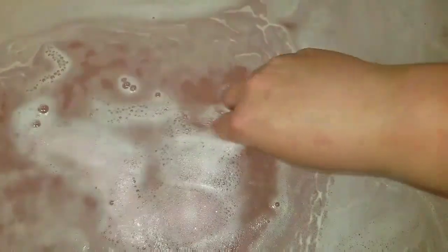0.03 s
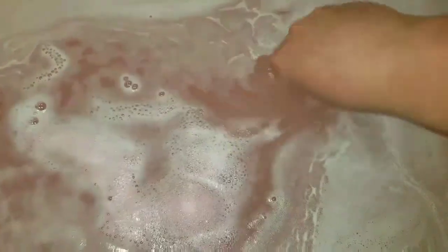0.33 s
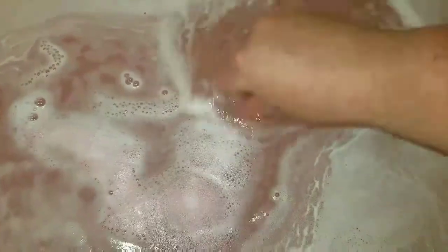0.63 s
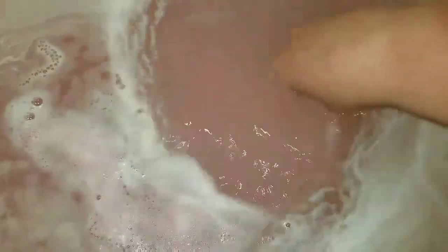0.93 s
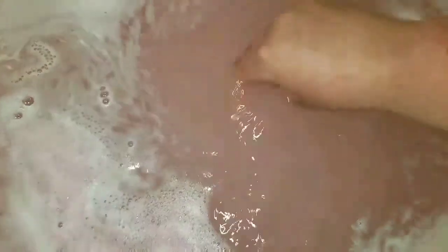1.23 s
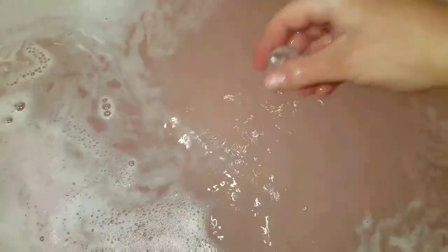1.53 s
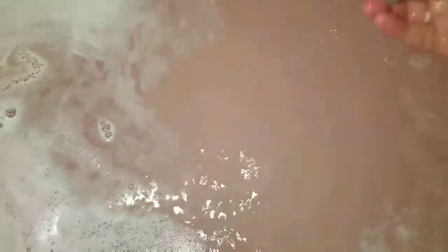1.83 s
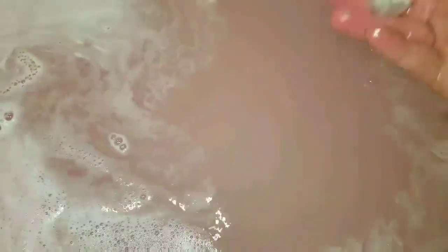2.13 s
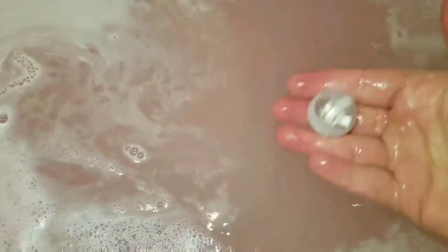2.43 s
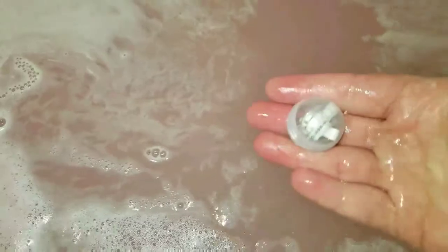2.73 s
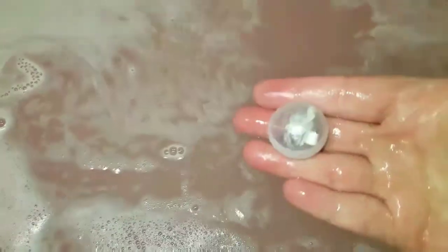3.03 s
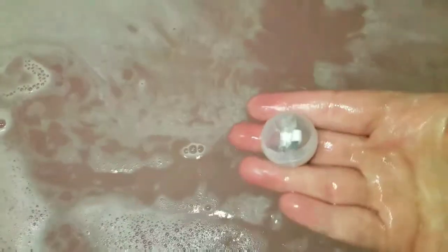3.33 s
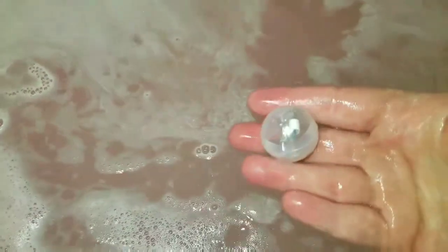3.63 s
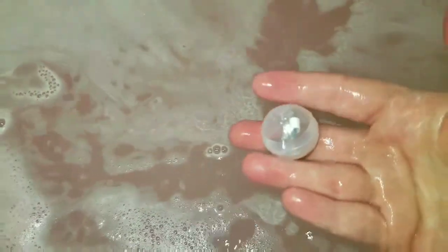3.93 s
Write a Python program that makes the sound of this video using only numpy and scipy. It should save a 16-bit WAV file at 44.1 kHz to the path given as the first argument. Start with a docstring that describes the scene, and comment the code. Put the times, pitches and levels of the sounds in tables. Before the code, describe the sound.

Small drips and bubbly plips come in a flurry with gentle sloshing as a hand moves through bathwater, then thin to single drops. Heard just above the tub, with short bathroom echo, fading foam fizz and a steady fan hum.

```python
"""A slosh and a flurry of plips: a hand stirs a foamy bath, lifts out and drips into the water.
Drops tick on the surface and trap bubbles that ring with rising pitch.
Tub, ceiling and hard walls of the small bathroom echo them.
The foam fizzes and grows softer as it settles, over faint hiss and the low hum of a fan."""
import sys
import numpy as np
from scipy import signal
from scipy.fft import rfft, irfft, next_fast_len
from scipy.io import wavfile
from scipy.ndimage import map_coordinates

SR = 44100
rng = np.random.default_rng(int(sys.argv[2]) if len(sys.argv) > 2 else 0)


def pcm_store(signal):
    """Save signal as 16-bit PCM."""
    levels = np.round(np.clip(np.atleast_2d(signal), -1, 1) * 32767)
    wavfile.write(sys.argv[1], SR, levels.astype(np.int16).T)


N = 176400  # 4 s

# ringing bubbles (time [s], start pitch [Hz], dry peak [dB], t60 [s], echo re dry [dB])
BUBBLE_RINGS = [(0.1524, 1710, -47.5, 0.017, -8), (0.164, 1340, -35, .006, -2.5),
                (0.1669, 1100, -42, 0.034, -1.5), (0.1728, 1840, -42.5, 0.015, -0.5),
                (.1888, 2150, -45, 0.0067, -1), (.1900, 2920, -48, 0.0065, -3),
                (.2105, 1390, -54, 0.0099, -10), (.2398, 2620, -52, 0.019, -4),
                (0.2553, 1500, -57, .010, 4), (0.4616, 1380, -60, 0.048, 5.5),
                (.4630, 1850, -51.5, 0.014, -1.5), (.5290, 2410, -63, 0.041, -10),
                (0.5646, 1935, -38, 0.013, -3.5), (.5885, 2220, -47, 0.005, -1),
                (.6690, 1055, -50.5, 0.027, 2), (.6680, 1530, -52, 0.011, 4),
                (0.8126, 1966, -31, 0.022, 3.5), (0.8374, 1543, -44.5, 0.036, -5),
                (1.091, 1756, -46.5, 0.022, 0.5), (1.0946, 1105, -53.5, 0.066, 1.5),
                (1.5606, 2527, -48, .020, 9), (1.573, 2570, -46.5, 0.014, 5),
                (1.59, 3070, -45.5, 0.004, 4.5), (2.291, 1717, -45.5, 0.028, 4),
                (3.1701, 2837, -49.5, 0.028, 2), (3.6283, 2495, -48, 0.059, -4),
                (3.6354, 2700, -53, 0.015, 2.5)]
# drops landing, films bursting (time [s], centre [Hz], dry peak [dB])
DROP_TICKS = [(0.141, 4050, -56), (.1535, 3800, -64), (.1750, 6500, -59), (.1908, 5200, -54.5),
              (.2110, 5600, -58), (.2420, 4900, -53), (.2550, 5800, -58), (.4630, 3620, -54),
              (0.5611, 12720, -41.5), (0.564, 5500, -57.5), (0.589, 3420, -49), (0.667, 5300, -52),
              (.8101, 13200, -48), (0.814, 3400, -54), (0.889, 4150, -54), (1.0935, 7340, -46),
              (1.1097, 7850, -48.5), (1.3490, 6340, -61), (1.373, 12900, -54), (1.5085, 11000, -51),
              (1.5599, 6340, -44), (1.563, 13900, -44), (1.5712, 13500, -49), (1.584, 4400, -53),
              (1.5933, 4880, -54), (1.7485, 15500, -48), (2.2910, 1900, -56), (2.585, 11600, -59.5),
              (3.1706, 4600, -58), (3.5868, 7100, -63), (3.63, 6740, -54.5), (3.6212, 14200, -47.5),
              (3.634, 4100, -59), (3.7580, 15000, -54.5)]
# tick echoes, finest ticks driest (centre [Hz], echo re dry [dB])
TICK_ECHO_DB = [(3000, 0.5), (7000, -1), (13000, -2.5)]
# water sliding round the hand (crest time [s], rise [s], fall [s], level [dB])
SLOSH_SWELLS = [(0.156, 0.075, 0.18, -59), (.68, 0.015, 0.089, -66), (1.11, 0.036, 0.15, -67.5),
                (1.36, 0.09, 0.15, -68)]
# slosh spectrum (frequency [Hz], relative level [dB])
SLOSH_SPECTRUM = [(200, 0.5), (500, 2), (1200, -8), (2500, -12.5), (4000, -26), (7000, -22), (10000, -52)]
# settling foam (time [s], level [dB])
FOAM_LEVEL_DB = [(0, -68), (.7, -67), (1.6, -68.5), (1.95, -72), (2.9, -74.5), (3.45, -72.5), (4, -76.5)]
# fizz spectrum (frequency [Hz], relative level [dB])
FOAM_SPECTRUM = [(1500, -7), (3500, -28), (5500, -7.5), (6600, -1), (7700, 2.5), (8300, -6), (9700, -6.5),
                 (11000, 1), (12200, 0), (13200, 8), (14300, 0.5), (15800, 8)]
# narrow hiss bands (crest time [s], 1/e half length [s], centre [Hz], level [dB])
HISS_SWELLS = [(1.372, 0.12, 3820, -84.5), (2.645, 0.063, 2070, -77.5), (2.69, 0.2, 1205, -76),
               (3.778, 0.15, 3170, -84)]
# fan hum lines (frequency [Hz], base level [dB], unsteadiness [0-1])
FAN_LINES = [(35.9, -64, 0.24), (75.56, -45, 0.22), (118.1, -49.5, 0.64), (194.9, -57, 0.8),
             (236, -65.5, 0.29), (254.7, -67.5, 0.4), (317.4, -69.5, 0.51), (354, -63.5, 0.77)]
# fan air rumble (frequency [Hz], relative level [dB])
AIR_SPECTRUM = [(20, -78.5), (45, -84), (68, -63), (105, -66.5), (135, -75.5), (185, -75), (215, -83.5),
                (330, -83), (420, -87.5), (520, -88.5), (750, -98), (1030, -103), (1140, -92),
                (1350, -101.5), (1700, -106.5), (2500, -112.5), (4000, -120), (8000, -125), (16000, -126)]
# gain on hum and rumble (time [s], gain [dB])
FAN_GAIN_DB = [(0, 1), (.17, 3.5), (.45, .5), (1.3, 0), (2.1, 0), (3.0, -0.5), (3.6, 0), (4, -1.5)]
# bathroom decay (frequency [Hz], t60 [s])
ROOM_T60_S = [(300, 0.82), (1200, 0.21), (2000, 0.37), (3200, 0.28), (7000, 0.22), (15000, 0.081)]

BUBBLE_ATTACK_S, PITCH_RISE_PER_S = 0.00036, 2.4  # rise as a fraction of start pitch
TICK_T60_S, TICK_WIDTH_HZ, TICK_SKIRT_DB = 0.0054, 1870, -21
SLOSH_LUMPS_DB, SLOSH_LUMPS_PER_S = 4.5, 280
POPS_PER_S, POP_SPREAD_DB, POPS_RE_HISS_DB = 900, -3.5, -6.5
HISS_WIDTH_HZ = 420
HUM_WAVER_PER_S, AIR_BASE_DB, AIR_DIRECT_RE_ROOM_DB = 7, -48.5, 1
WALL_DELAY_S, CEILING_DELAY_S, CEILING_WIDTH_S, CEILING_BOOST_DB = 0.0042, 0.025, 0.0019, 5.5
TOP_HZ = 15850


def plips():
    """Each trapped bubble rings briefly, rising in pitch as it nears the surface."""
    out, t = np.zeros(N), np.arange(SR // 20) / SR
    for start_s, hz, peak_db, t60_s, echo_db in BUBBLE_RINGS:
        envelope = (1 - np.exp(-t / BUBBLE_ATTACK_S)) * amp(-60 * t / t60_s)
        cycles = hz * (t + PITCH_RISE_PER_S * t * t / 2)
        ring = np.sin(2 * np.pi * cycles) * envelope / envelope.max()
        add(out, start_s, in_room(amp(peak_db) * ring, echo_db))
    return out


def ticks():
    """Drops land, films burst: millisecond noise snaps, one band over a broadband skirt."""
    out, t = np.zeros(N), np.arange(SR // 50) / SR
    for start_s, centre_hz, peak_db in DROP_TICKS:
        snap = rng.standard_normal(len(t)) * amp(-60 * t / TICK_T60_S)
        burst = filtered(snap, lambda hz: amp(TICK_SKIRT_DB) + bell(hz, centre_hz, TICK_WIDTH_HZ))
        tick = amp(peak_db) * burst / np.abs(burst).max()
        add(out, start_s, in_room(tick, at_hz(TICK_ECHO_DB, centre_hz)))
    return out


def sloshes():
    """The hand moves water in soft, lumpy swells."""
    swell, t = np.zeros(N), np.arange(N) / SR
    for crest_s, rise_s, fall_s, db in SLOSH_SWELLS:
        exponent = np.where(t < crest_s, ((crest_s - t) / rise_s) ** 2, (t - crest_s) / fall_s)
        swell += amp(db) * np.exp(-exponent)
    lumps = amp(SLOSH_LUMPS_DB * wobble(SLOSH_LUMPS_PER_S))
    return swell * coloured(rng.standard_normal(N) * lumps, SLOSH_SPECTRUM)


def foam():
    """Countless tiny bubbles burst: hiss with single pops standing out."""
    onsets = rng.random(N) < POPS_PER_S / SR
    pops = onsets * rng.standard_normal(N) * amp(POP_SPREAD_DB * rng.standard_normal(N))
    fizz = rng.standard_normal(N) + amp(POPS_RE_HISS_DB) * unit_rms(pops)
    return gain_curve(FOAM_LEVEL_DB) * coloured(fizz, FOAM_SPECTRUM)


def hiss_bands():
    """Faint narrow bands of hiss swell and fade."""
    out, t = np.zeros(N), np.arange(N) / SR
    for crest_s, half_s, hz, db in HISS_SWELLS:
        band = np.real(complex_wobble(HISS_WIDTH_HZ) * np.exp(2j * np.pi * hz * t))
        out += amp(db) * bell(t, crest_s, half_s) * unit_rms(band)
    return out


def fan():
    """Wavering hum lines over a rumble of moving air that excites the room."""
    t = np.arange(N) / SR
    room_air = signal.fftconvolve(rng.standard_normal(N + SR), room_tail(), mode='valid')[:N]
    direct_air = amp(AIR_DIRECT_RE_ROOM_DB) * rng.standard_normal(N)
    out = amp(AIR_BASE_DB) * coloured(unit_rms(room_air) + direct_air, AIR_SPECTRUM)
    for hz, db, unsteady in FAN_LINES:
        waver = 1 - unsteady + unsteady * complex_wobble(HUM_WAVER_PER_S) / np.sqrt(2)
        carrier = np.exp(2j * np.pi * (hz * t + rng.random()))
        out += amp(db) * unit_rms(np.real(waver * carrier))
    return out * gain_curve(FAN_GAIN_DB)


def room_tail():
    """Bathroom impulse response, new for each spot: walls first, then a cluster of ceiling echoes."""
    hz, frame_s, bins = signal.stft(rng.standard_normal(SR // 2), SR, nperseg=256)
    decay = amp(-60 * frame_s / at_hz(ROOM_T60_S, hz)[:, None])
    tail = signal.istft(bins * decay, SR, nperseg=256)[1]
    t = np.arange(len(tail)) / SR
    wall_onset = 1 - np.exp(-(t / WALL_DELAY_S) ** 4)
    ceiling = amp(CEILING_BOOST_DB * bell(t, CEILING_DELAY_S, CEILING_WIDTH_S))
    return tail * wall_onset * ceiling


def in_room(sound, echo_db):
    """Sound plus its echoes, echo_db above it in energy."""
    wet = signal.fftconvolve(sound, room_tail())
    wet_gain = amp(echo_db) * np.linalg.norm(sound) / np.linalg.norm(wet)
    return np.pad(sound, (0, len(wet) - len(sound))) + wet_gain * wet


def amp(db):
    """Decibels to gain."""
    return 10 ** (np.asarray(db) / 20)


def unit_rms(x):
    """Scale to rms 1."""
    return x / np.sqrt(np.mean(x ** 2) + 1e-20)


def bell(x, centre, width):
    """Gaussian, 1/e at centre +/- width."""
    return np.exp(-((x - centre) / width) ** 2)


def gain_curve(points):
    """Per-sample gain from (time [s], level [dB]) points."""
    return amp(np.interp(np.arange(N) / SR, *np.transpose(points)))


def at_hz(points, hz):
    """Interpolate (frequency [Hz], value) points on a log axis."""
    knots_hz, values = np.transpose(points)
    return np.interp(np.log(hz + 1), np.log(knots_hz + 1), values)


def filtered(x, response):
    """Zero-phase filter with gain response(hz)."""
    size = next_fast_len(len(x) + 8192)
    return irfft(rfft(x, size) * response(np.fft.rfftfreq(size, 1 / SR)), size)[:len(x)]


def coloured(x, spectrum):
    """Shape x by (frequency [Hz], level [dB]) points; rms 1."""
    return unit_rms(filtered(x, lambda hz: amp(at_hz(spectrum, hz))))


def wobble(knots_per_s):
    """Smooth random curve."""
    return map_coordinates(rng.standard_normal(N // 20), [np.arange(N) * knots_per_s / SR], mode='wrap')


def complex_wobble(knots_per_s):
    """Smooth random amplitude and phase."""
    return wobble(knots_per_s) + 1j * wobble(knots_per_s)


def add(track, start_s, sound):
    """Mix sound into track."""
    i = max(round(start_s * SR), 0)
    track[i:i + len(sound)] += sound[:max(N - i, 0)]


def scene():
    """Mono mix, heard above the bath."""
    return (plips() + ticks() + sloshes() + hiss_bands() + foam() + fan())[None]


def record(dry):
    """Brick-wall low-pass at TOP_HZ."""
    return np.array([filtered(channel, lambda hz: hz < TOP_HZ) for channel in dry])


dry = scene()
out = record(dry)
pcm_store(out)
```